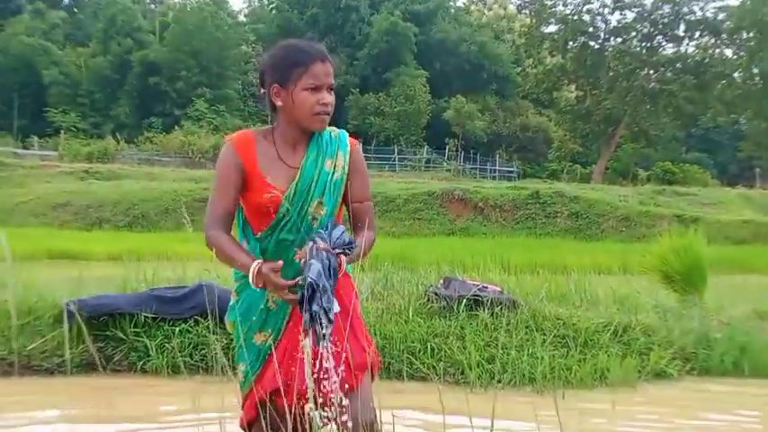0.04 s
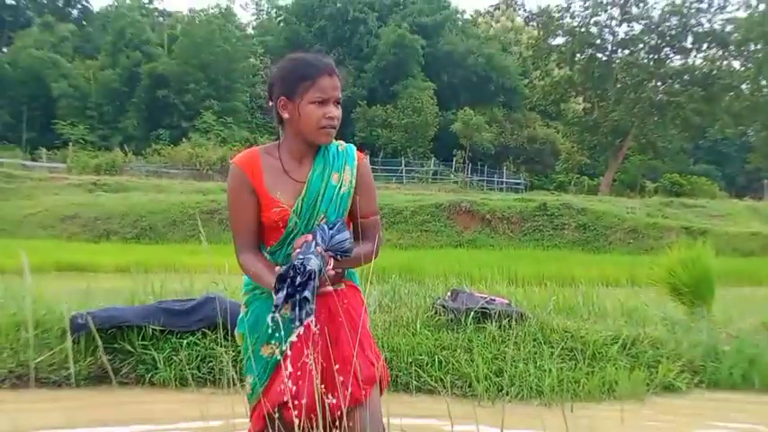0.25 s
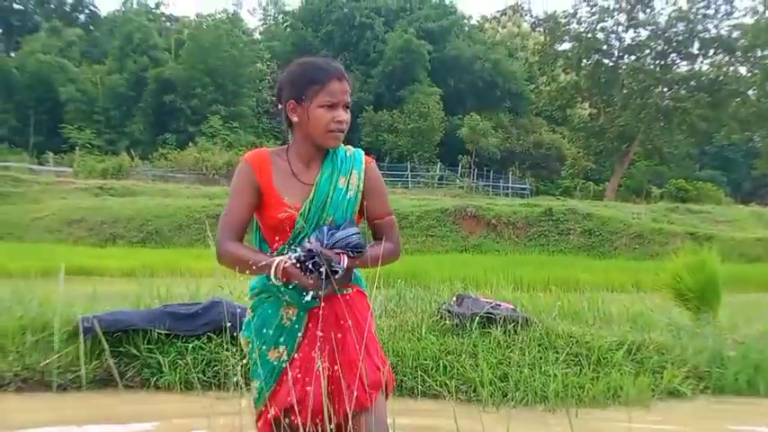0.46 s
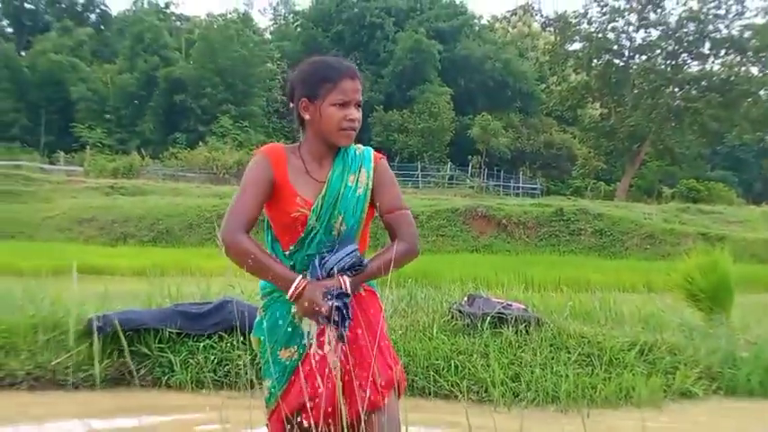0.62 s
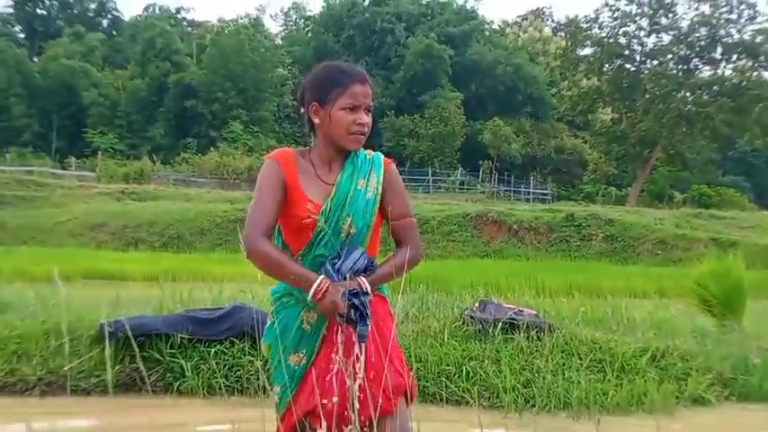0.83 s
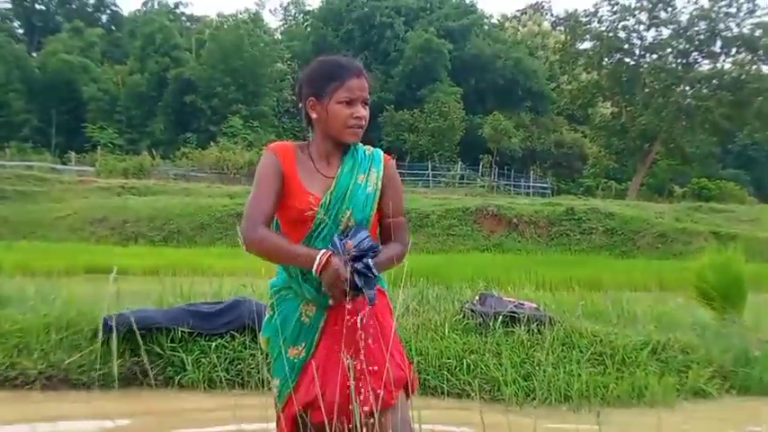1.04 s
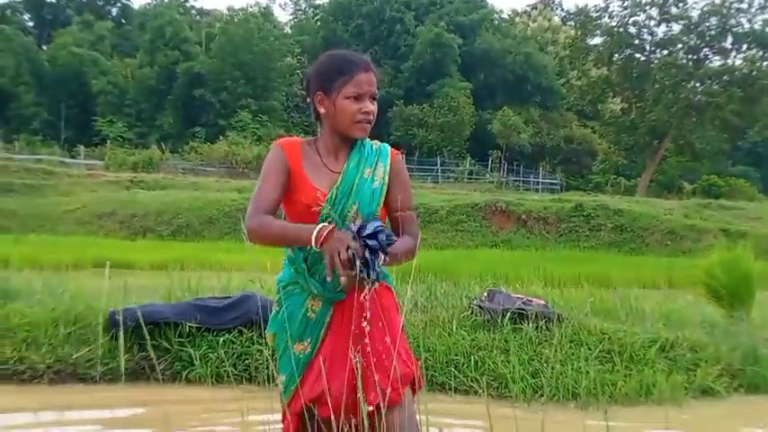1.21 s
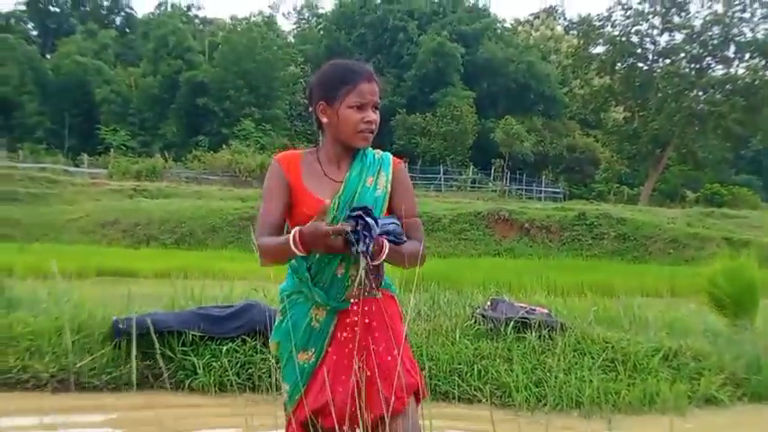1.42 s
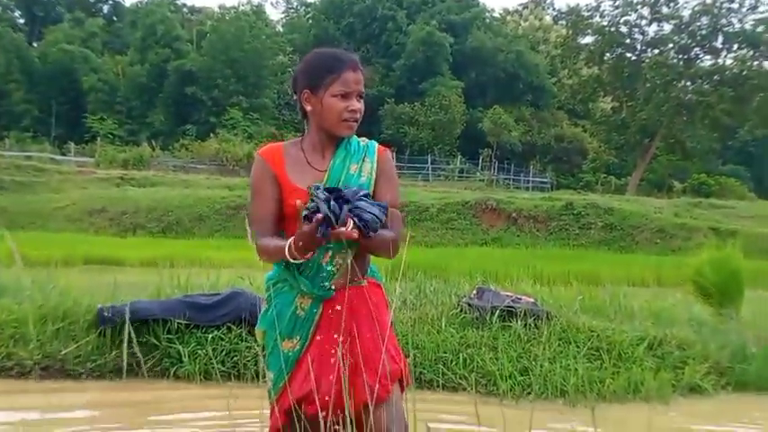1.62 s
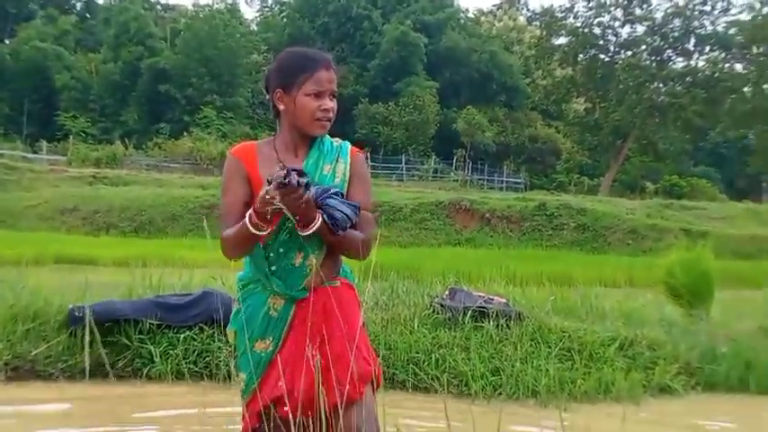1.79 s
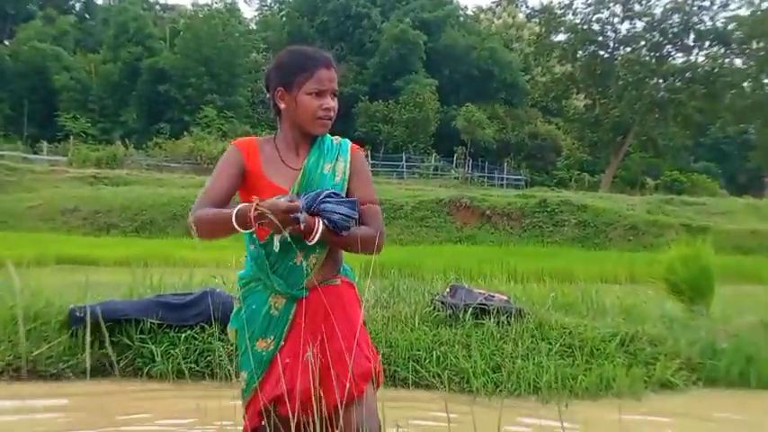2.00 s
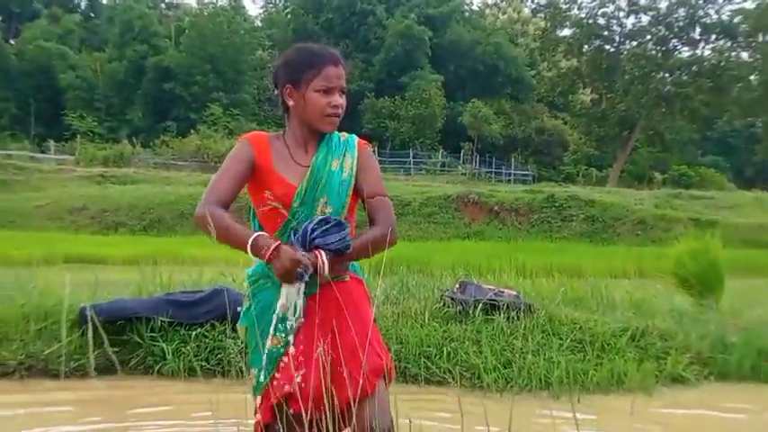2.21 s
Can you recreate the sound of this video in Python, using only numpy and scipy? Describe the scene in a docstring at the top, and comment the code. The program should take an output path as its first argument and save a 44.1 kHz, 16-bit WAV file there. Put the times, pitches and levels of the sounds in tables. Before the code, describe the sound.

Soft, uneven trickling and dripping as wet cloth is wrung over a pond in gusty wind.

```python
"""A fine spatter of water on a pond, over a low breeze and the quiet hiss of open fields.
Wet cloth is being wrung out above the water: drops hit the surface and trap tiny bubbles that
chirp upward, and the spatter swells with each squeeze, with splats and squelches from the cloth.
Wind buffets the single microphone in low, fluttering bumps. Far off, a bird whistles once."""
import sys
import numpy as np
from scipy import signal
from scipy.fft import rfft, irfft
from scipy.io import wavfile

SR = 44100
rng = np.random.default_rng(int(sys.argv[2]) if len(sys.argv) > 2 else 0)


def dump(signal):
    """Clip the signal to [-1, 1] and save it as 16-bit WAV at the path in sys.argv[1]."""
    limited = np.clip(np.atleast_2d(signal).T, -1, 1)
    pcm = np.round(limited * 32767).astype(np.int16)
    wavfile.write(sys.argv[1], SR, pcm)


N = 103635
T = np.arange(N) / SR

# flow of water falling on the pond: t/s, gain/dB
WATER_FLOW = [(0, -2), (.08, -4), (.15, -5.5), (.27, -6.5), (.32, -1.5), (.39, -9.5), (.5, -1.5),
              (.57, -9.5), (.76, -9), (.84, -6), (.91, 0), (1.01, 2), (1.04, -7.5), (1.12, -1.5),
              (1.25, -9), (1.4, -8), (1.85, -13), (2.03, -6), (2.1, -14), (2.35, -8.5)]
# colour of the small droplets: f/Hz, gain/dB
SPATTER_COLOUR = [(1500, 2), (5500, 8), (7500, -4), (12000, -1)]
# colour of the finest spray: f/Hz, gain/dB
SPRAY_COLOUR = [(500, -27), (1100, -2), (2000, 0), (3100, 0.5), (4000, 1.5), (6000, 0.5), (7600, -9),
                (9700, -8.5), (13300, -23), (14300, -14), (15200, -9)]
# steady breeze on the microphone: f/Hz, gain/dB
BREEZE_COLOUR = [(25, -47), (50, -11.5), (90, -6.5), (113, 0.5), (140, -8.5), (220, -16.5), (350, -20.5),
                 (600, -22), (900, -32), (1500, -67)]
# hiss of the surrounding fields: f/Hz, gain/dB
FIELD_COLOUR = [(300, -0.5), (800, -6.5), (1080, -9), (1500, 0), (1850, 1), (2600, -3.5), (3120, -19.5),
                (3600, -7.5), (4600, -12), (5300, -23), (6200, -15.5), (7400, -33), (9800, -21.5),
                (13200, -37), (15200, -25.5)]
# rise and fall of that hiss: t/s, gain/dB
FIELD_SWELL = [(0, 2.5), (1.2, 2), (1.6, 3), (1.85, 1), (1.99, 4.5), (2.35, 3)]
# clear drops: t/s, level/dB before colouring, bubble f/Hz, ring/s, second bubble re first/dB
CLEAR_DROPS = [(0.022, -49.5, 8330, 0.006, -14), (0.131, -45, 5040, .004, -1),
               (0.147, -46, 4850, 0.008, -3), (0.1797, -42.5, 4000, 0.0031, -7),
               (0.25, -43.5, 4670, 0.004, -6), (0.252, -46, 3570, 0.0076, -5),
               (0.306, -41, 2050, 0.0054, -19), (0.3592, -42.5, 4240, 0.0031, 3.5),
               (0.44, -40, 5030, 0.0038, -28), (.4638, -34, 4950, 0.0029, -33),
               (0.623, -48, 4940, 0.0057, -2), (0.636, -44.5, 3570, 0.011, -21),
               (0.657, -49.5, 9150, 0.0033, -17), (0.831, -49, 8030, 0.0042, -14),
               (0.8638, -34.5, 3680, 0.013, -11.5), (0.8807, -37, 3470, 0.0029, -2.5),
               (.895, -50, 1003, 0.029, -13), (0.907, -41.5, 3700, 0.0074, -3.5),
               (0.9264, -40.5, 1840, 0.005, -18), (0.928, -46.5, 8940, 0.0035, -18),
               (0.935, -42, 2760, 0.0035, -14), (0.996, -41.5, 5370, 0.0034, -16),
               (1.003, -44, 8600, 0.0033, -14), (1.012, -48.5, 666, 0.038, -12),
               (1.084, -47, 3520, 0.011, -1.5), (1.101, -47.5, 5140, 0.0053, -9),
               (1.163, -46, 9400, 0.0044, -15), (1.2395, -44, 7700, 0.0021, -9),
               (1.256, -40.5, 3620, 0.0035, -8), (1.471, -38, 3350, 0.0037, -2.5),
               (1.5095, -48, 3820, 0.0037, 2.5), (1.918, -29, 2516, 0.0033, -19),
               (1.9188, -35.5, 3410, 0.0052, -24), (1.9206, -41, 5040, 0.006, -18)]
# softened treble of the drops: f/Hz, gain/dB
DROP_COLOUR = [(6200, -0.5), (7400, -7), (10000, -2), (12500, -3)]
# wind buffets on the microphone: peak t/s, level/dB, rise/s, fall/s, upper edge f/Hz
WIND_BUFFETS = [(.103, -37.5, 0.0057, 0.024, 263), (0.153, -34.5, 0.012, 0.019, 310),
                (.229, -36.5, 0.002, 0.012, 442), (.253, -32, 0.022, 0.043, 215),
                (.365, -36, 0.021, 0.024, 188), (0.434, -36, 0.0078, 0.042, 186),
                (.487, -27.5, 0.00496, 0.012, 370), (.509, -29, 0.0017, 0.012, 433),
                (.534, -21, 0.0023, 0.018, 320), (.557, -22.5, 0.011, 0.016, 453),
                (.579, -21, 0.0035, 0.012, 191), (.605, -24, 0.0081, 0.017, 219),
                (.678, -31.5, 0.027, 0.031, 213), (.812, -38.5, 0.033, 0.02, 172),
                (1.059, -39, 0.026, 0.032, 181), (1.08, -36, 0.0023, 0.0057, 350),
                (1.128, -37.5, 0.0046, 0.0066, 206), (1.699, -45, 0.036, 0.082, 153),
                (1.837, -26.5, 0.0031, 0.0073, 251), (1.866, -38.5, 0.0094, 0.04, 196),
                (2.07, -39.5, 0.007, 0.0087, 239), (2.15, -45, 0.039, 0.036, 183)]
# water slapping the cloth: t/s, level/dB
CLOTH_SPLATS = [(0.1712, -55.5), (.2265, -51.5), (.304, -51), (.330, -56), (0.907, -46.5), (1.008, -47.5),
                (1.049, -50.5), (1.195, -54), (1.918, -54)]
# colour of a splat: f/Hz, gain/dB
SPLAT_COLOUR = [(400, -17), (1100, -1), (2000, 5.5), (3100, -4), (4500, 5), (7600, -6), (9700, -8),
                (13600, -15), (14900, 0), (15800, -15)]
# water forced through the weave: peak t/s, level/dB, half length/s, bubble f/Hz
CLOTH_SQUELCHES = [(0.487, -58, 0.028, 4840), (2.039, -65, 0.033, 5500), (2.3, -69.5, .07, 5580)]


def undb(db):
    """Decibels to gain."""
    return 10 ** (np.asarray(db) / 20)


def level(x, db):
    """Set the rms level."""
    return x * undb(db) / np.sqrt(np.mean(x ** 2) + 1e-20)


def colour(x, points):
    """Filter by a curve of f/Hz, gain/dB."""
    hz, db = np.array(points).T
    f = np.fft.rfftfreq(len(x), 1 / SR) + 1
    gain = undb(np.interp(np.log(f), np.log(hz), db))
    return irfft(rfft(x) * gain, len(x))


def add(out, start, x):
    """Mix x in at start seconds."""
    i = int(np.clip(start * SR, 0, N - 1))
    out[i:i + len(x)] += x[:N - i]


def swell(age):
    """Rises smoothly to 1 at age 1, then dies away."""
    return (age * np.exp(1 - age)) ** 2


def bubble(hz, ring_s, octaves_per_ring=0.33, swell_share=0.19):
    """A trapped bubble swells, rings and dies while its pitch rises."""
    age = np.arange(int(2 * ring_s * SR)) / (ring_s * SR)
    pitch = np.minimum(hz * 2 ** (octaves_per_ring * age), SR / 2)
    return swell(age / swell_share) * np.sin(2 * np.pi * np.cumsum(pitch) / SR)


def spatter(flow, per_s=380, low_hz=2000, high_hz=10500, ring_cycles=13, full_spread_db=4):
    """Small droplets chirp on the pond; the thicker the stream, the more uneven their sizes."""
    out = np.zeros(N)
    for k, (when, pitch, chance) in enumerate(rng.random((int(per_s * N / SR), 3))):
        start = (k + 2 * when) / per_s
        hz = low_hz + (high_hz - low_hz) * pitch
        spread_db = full_spread_db * min(np.interp(start, T, flow), 1)
        size = min(-np.log(chance), 3.5)
        add(out, start, undb(spread_db * size) * bubble(hz, ring_cycles / hz))
    return level(colour(out, SPATTER_COLOUR), db=-61) * flow


def spray(flow, per_s=5000):
    """The finest droplets tick on the surface without ringing."""
    ticks = (rng.random(N) < per_s / SR) * rng.choice([-1, 1], N)
    return level(colour(ticks, SPRAY_COLOUR), db=-60) * flow


def plops(flow, per_s=130, low_hz=601, high_hz=2230, ring_cycles=14):
    """The stream traps larger, lower bubbles, louder when it runs thick."""
    out = np.zeros(N)
    for k, (when, pitch) in enumerate(rng.random((int(per_s * N / SR), 2))):
        hz = low_hz * (high_hz / low_hz) ** pitch
        add(out, (k + 2 * when) / per_s, bubble(hz, ring_cycles / hz))
    return level(out, db=-64.5) * flow


def breeze():
    """Steady air rumbles right on the microphone."""
    return level(colour(rng.standard_normal(N), BREEZE_COLOUR), db=-48.5)


def field_hiss():
    """The fields and trees around the pond hiss, swelling and sinking a little."""
    hiss = level(colour(rng.standard_normal(N), FIELD_COLOUR), db=-58)
    return hiss * undb(np.interp(T, *np.array(FIELD_SWELL).T))


def drops(smack_db=-10, smack_oct=0.28, smack_peak_s=0.0026,
          pitch_step=1.451, gap_s=0.0011, scatter_oct=0.11, last_step_db=-10):
    """Each clear drop smacks the pond and traps a bubble that breaks twice into a smaller one."""
    out, t = np.zeros(N), T[:2048]
    f = np.fft.rfftfreq(len(t), 1 / SR) + 1
    for start, db, hz, ring_s, second_db in CLEAR_DROPS:
        around_pitch = np.exp(-(np.log2(f / hz) / smack_oct) ** 2 / 2)
        smack = irfft(rfft(rng.standard_normal(len(t))) * around_pitch)
        add(out, start, level(smack, db + smack_db) * swell(t / smack_peak_s))
        for k, step_db in enumerate([0, second_db, second_db + last_step_db]):
            detune_oct = min(k, 1) * scatter_oct * rng.standard_normal()
            pitch = hz * pitch_step ** k * 2 ** detune_oct
            add(out, start + k * gap_s, undb(db + step_db) * bubble(pitch, ring_s))
    return colour(out, DROP_COLOUR)


def buffets(eddies_per_s=330, spread_db=0.55, low_edge_share=0.3, edge_order=4.59):
    """Each buffet is a quick run of eddies that thump the microphone; faster air sits higher."""
    out, n = np.zeros(N), 32768
    f = np.fft.rfftfreq(n, 1 / SR)
    t = (np.arange(n) - n // 2) / SR  # zero at the buffet's peak
    for peak, db, rise, fall, edge_hz in WIND_BUFFETS:
        when, side, chance = rng.random((400, 3)).T
        at = ((np.arange(len(when)) + when) * SR / eddies_per_s).astype(int)
        pushes = np.sign(side - 0.5) * undb(-spread_db * np.log(chance))
        eddies = np.zeros(n)
        eddies[at[at < n]] = pushes[at < n]
        low_slope = (f / (low_edge_share * edge_hz)) ** 3
        band = low_slope / np.hypot(1, low_slope) / np.hypot(1, (f / edge_hz) ** edge_order)
        envelope = np.where(t < 0, np.exp(-(t / rise) ** 2 / 2), np.exp(-abs(t) / fall))
        air = irfft(rfft(eddies) * band) * envelope
        rms = np.sqrt(np.sum(air ** 2) / np.sum(envelope ** 2))
        out += np.interp(T - peak, t, undb(db) * air / rms, left=0, right=0)
    return out


def knocks(hz=810, below_buffet_db=7, sudden_rise_s=0.0048):
    """A buffet's front knocks on the microphone, harder the steeper and brighter it is."""
    out, t = np.zeros(N), T[:512]
    brightest_hz = max(row[4] for row in WIND_BUFFETS)
    knock = swell(t * hz * 2) * np.sin(2 * np.pi * hz * t)
    for peak, db, rise, _, edge_hz in WIND_BUFFETS:
        steepness = min(sudden_rise_s / rise, 1) ** 0.5
        brightness = (edge_hz / brightest_hz) ** 3
        add(out, peak - rise / 2, undb(db - below_buffet_db) * steepness * brightness * knock)
    return out


def splats(peak_s=0.0025):
    """Short bright bursts where water slaps the cloth."""
    out, t = np.zeros(N), T[:2048]
    for start, db in CLOTH_SPLATS:
        burst = colour(rng.standard_normal(len(t)), SPLAT_COLOUR)
        add(out, start, level(burst, db) * swell(t / peak_s))
    return out


def squelches(per_s=1100, scatter_oct=0.2, ring_s=0.003):
    """A squeeze presses a dense froth of like-sized bubbles out of the cloth."""
    out = np.zeros(N)
    for peak, db, half_s, hz in CLOTH_SQUELCHES:
        froth = np.zeros(N)
        for when, pitch in rng.standard_normal((int(per_s * 2 * half_s), 2)):
            add(froth, peak + half_s * when, bubble(hz * 2 ** (scatter_oct * pitch), ring_s))
        time_share = np.pi * half_s * SR / N  # sets the level over the squelch's own length
        out += level(froth, db) * np.sqrt(time_share)
    return out


def far_bird(start_s=0.675, length_s=0.15, from_hz=4500, to_hz=3800, db=-65.5):
    """One faint, falling whistle from the distant trees."""
    progress = np.clip((T - start_s) / length_s, 0, 1)
    hz = from_hz * (to_hz / from_hz) ** progress
    envelope = np.sin(np.pi * np.sqrt(progress))
    return undb(db) * envelope * np.sin(2 * np.pi * np.cumsum(hz) / SR)


def scene():
    """Falling water, wind and fields at one microphone by the pond."""
    flow = undb(np.interp(T, *np.array(WATER_FLOW).T))
    water = drops() + splats() + squelches() + spatter(flow) + spray(flow) + plops(flow)
    wind = buffets() + knocks() + breeze()
    distance = field_hiss() + far_bird()
    return (water + wind + distance)[None]


def record(dry, low_hz=47.3, top_hz=15850):
    """The microphone sheds the deepest rumble and the recorder cuts the top."""
    low_cut = signal.butter(3, low_hz, "high", fs=SR, output="sos")
    top_cut = signal.ellip(10, 0.2, 70, top_hz, fs=SR, output="sos")
    return signal.sosfilt(top_cut, signal.sosfilt(low_cut, dry))


dry = scene()
out = record(dry)
dump(out)
```